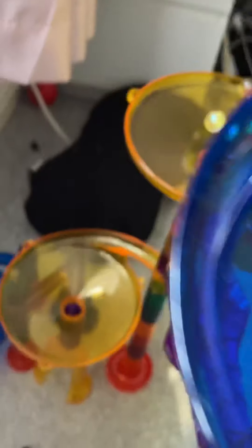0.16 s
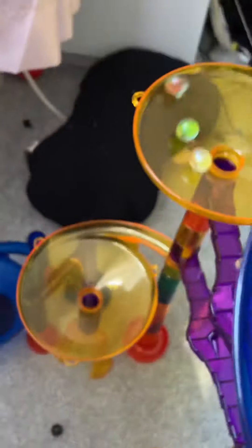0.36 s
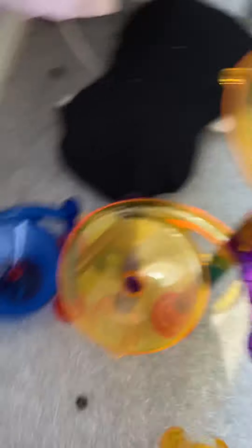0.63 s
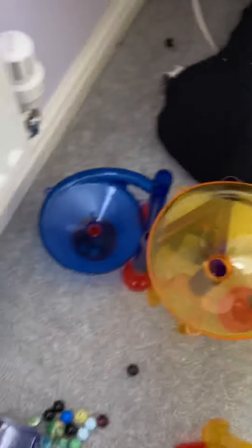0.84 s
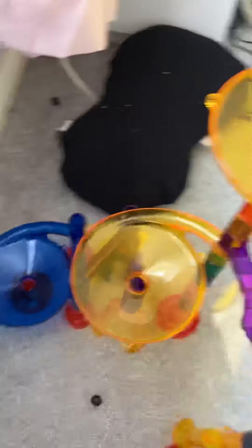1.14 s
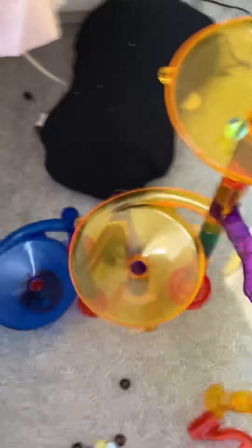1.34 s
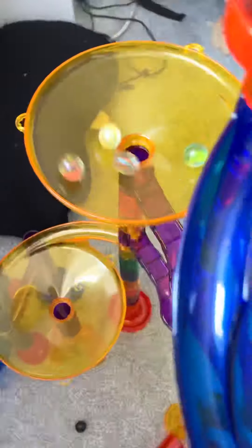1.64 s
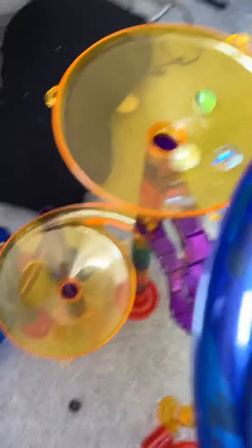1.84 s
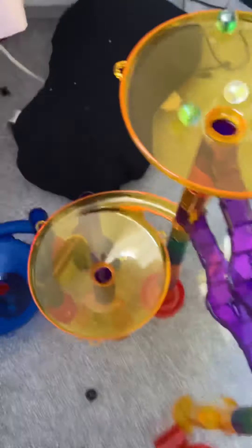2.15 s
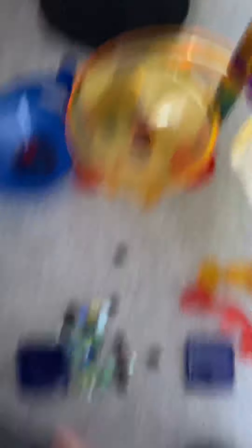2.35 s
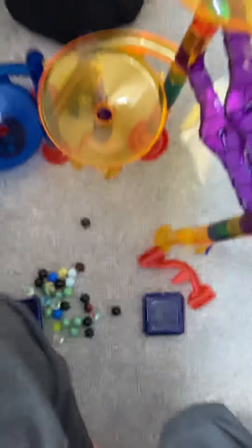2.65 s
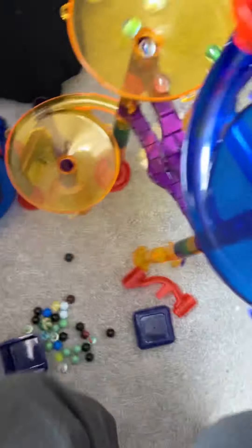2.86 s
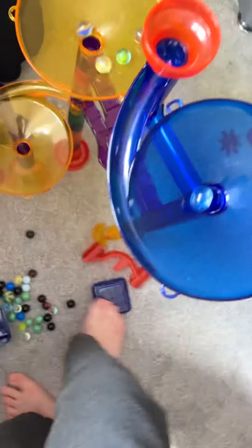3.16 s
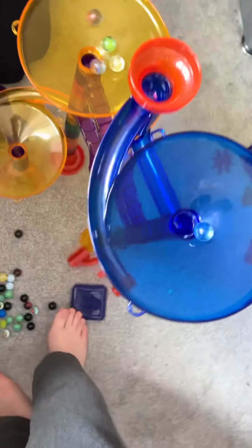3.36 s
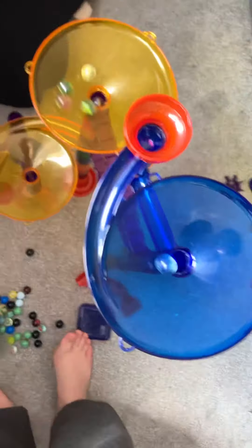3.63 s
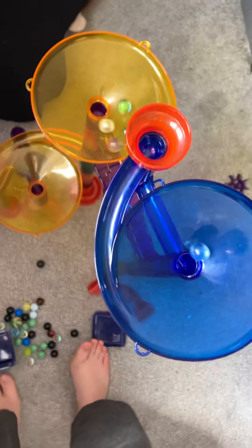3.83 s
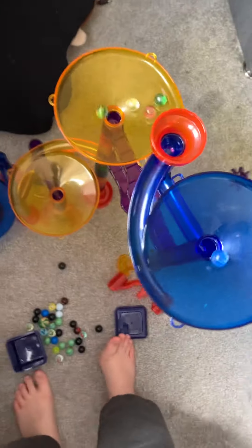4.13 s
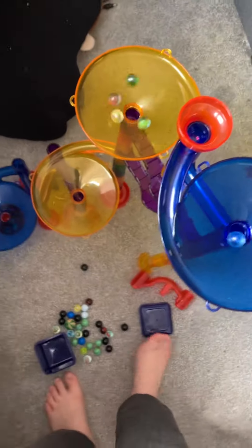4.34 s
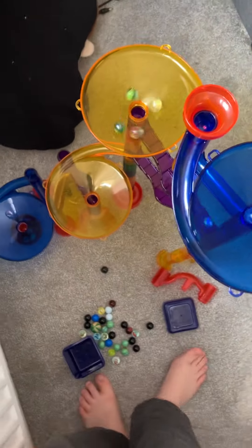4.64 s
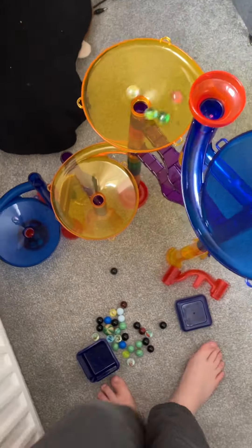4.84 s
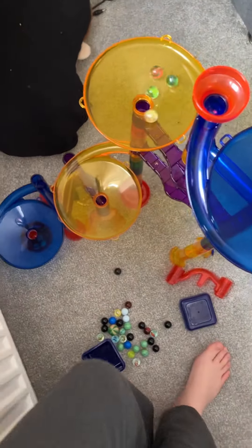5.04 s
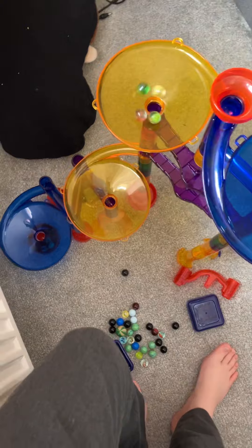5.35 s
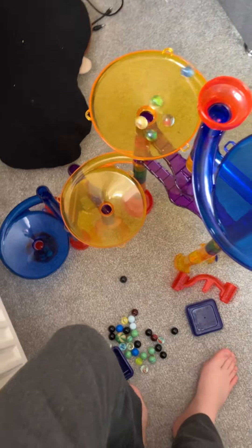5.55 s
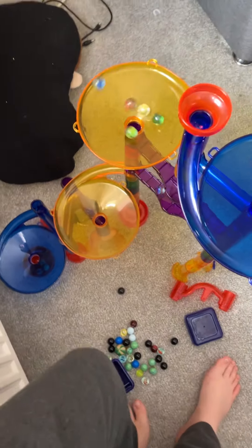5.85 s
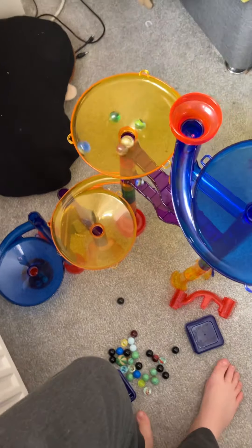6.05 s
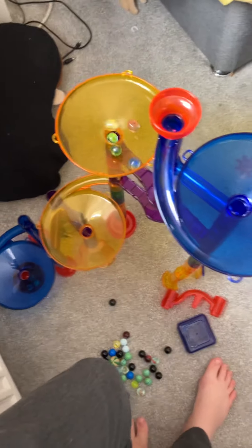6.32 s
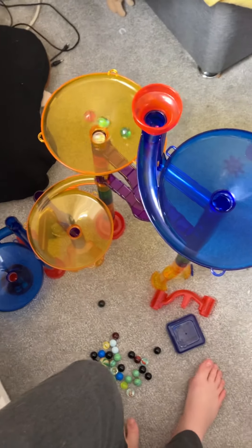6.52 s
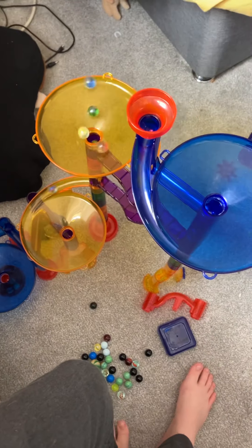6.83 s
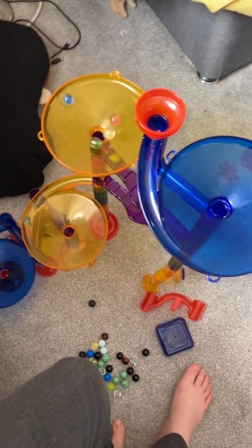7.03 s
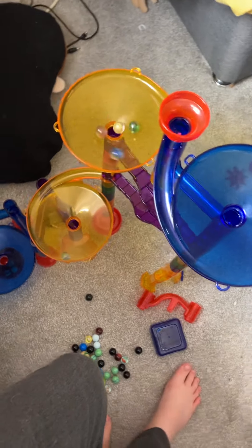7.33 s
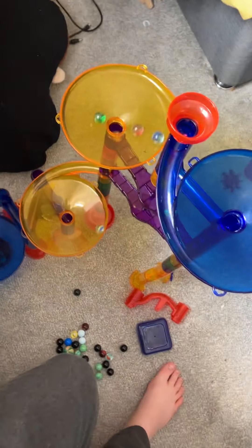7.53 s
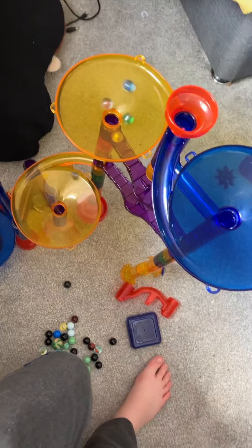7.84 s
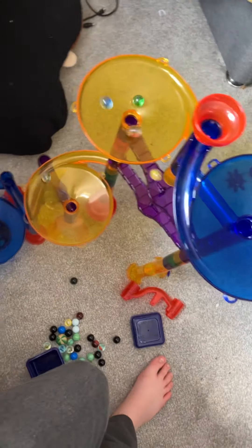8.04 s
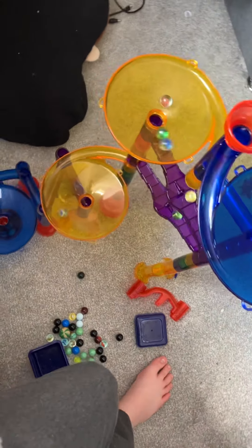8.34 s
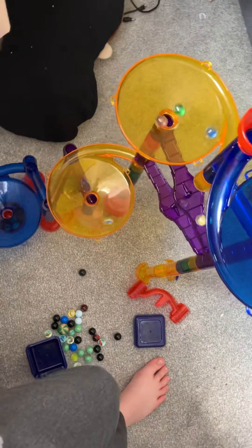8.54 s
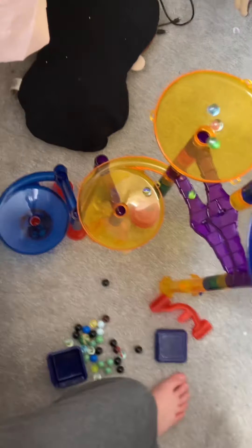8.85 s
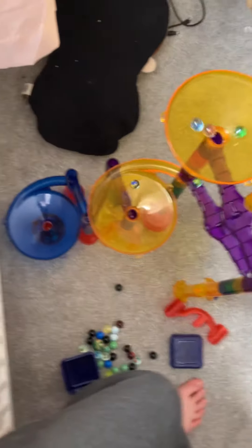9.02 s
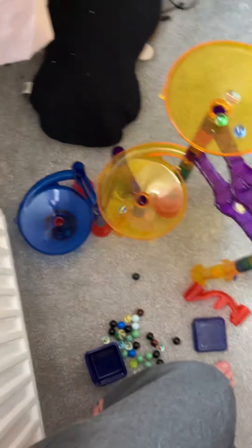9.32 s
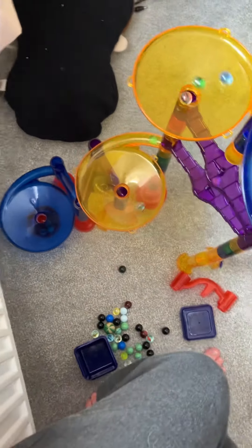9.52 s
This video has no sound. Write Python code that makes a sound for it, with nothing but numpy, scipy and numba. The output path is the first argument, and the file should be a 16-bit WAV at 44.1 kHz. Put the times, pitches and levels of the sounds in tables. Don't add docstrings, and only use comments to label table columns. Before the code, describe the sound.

A plastic marble run heard close on a hand-held phone in a dry, carpeted room. Rolling marbles drone and hiss steadily in the funnels while irregular knocks ring the hollow plastic early on. After a quieter stretch, marble after marble drops onto steps with rapid bright clacks, rebounds and short glassy cracks, until the last burst dies into rolling and faint taps. Low soft footfalls and hand tremor lie underneath.

```python
import sys
import numpy as np
from scipy import signal
from scipy.fft import rfft, irfft
from scipy.io import wavfile
from scipy.ndimage import uniform_filter1d, minimum_filter1d
from numba import njit

SR = 44100
rng = np.random.default_rng(int(sys.argv[2]) if len(sys.argv) > 2 else 0)


def output_pcm(signal):
    pcm = np.clip(np.atleast_2d(signal).T, -1, 1) * 32767
    wavfile.write(sys.argv[1], SR, np.round(pcm).astype(np.int16))


def natural_amplitude(level_db):
    exponent = np.asarray(level_db, float) / 20
    return 10 ** exponent


N = 426888
HZ = np.arange(N // 2 + 1) * SR / N
FUNNELS_UNTIL_S, CHUTE_FROM_S = 3.23, 3.75
CONTACT_S = 0.0008

# centre in Hz, width in Hz, level in dB.
SHELL = [(974, 170, -6), (1340, 58, 2), (1490, 73, 2.5), (1740, 258, -4), (2360, 220, -10.5),
         (2810, 670, -20)]


def colour(x, points):
    hz, db = np.transpose(points)
    curve_db = np.interp(np.log(HZ + 1), np.log(hz), db)
    return irfft(rfft(x) * natural_amplitude(curve_db), N)


def resonate(x, peaks):
    gain = 0
    for k, (f, width, db) in enumerate(peaks):
        bandpass = 1j * HZ * width / (f * f - HZ * HZ + 1j * HZ * width)
        gain = gain + (-1) ** k * natural_amplitude(db) * bandpass
    return irfft(rfft(x) * gain, N)


def unit(x):
    return x / np.sqrt(np.mean(x ** 2))


def walk(rate):
    hold = int(SR / rate)
    steps = np.repeat(rng.standard_normal(N // hold + 1), hold)
    return unit(uniform_filter1d(steps, hold)[:N])


def spread(make, likeness):
    likeness = np.clip(likeness, 0, 1)
    common = np.sqrt(1 + likeness) * make()
    opposed = np.sqrt(1 - likeness) * make() * np.array([[1], [-1]])
    return common + opposed


def hollow_db(s):
    # time in seconds, boom in dB.
    boom = [(0, 5), (.95, 9), (1.3, -1), (2.9, 5), (3.2, -3), (4.1, -3), (4.9, -3), (6.0, 1), (6.7, -6.5),
            (7.2, -1.5), (7.6, -4.5), (8.1, 0.5), (9.68, 0.5)]
    return np.interp(s, *np.transpose(boom))


def contacts(rebound_s, loss_db, dull_db, count):
    # start in seconds, peak in dB, strongest mode in Hz, then the level of the hard upper modes
    # and of the crack, both in dB relative to the peak.
    joints = [(0.0202, -27, 1530, -9, -3), (0.3889, -19.5, 1420, -20, -17), (0.4691, -20, 1380, -32, -13.5),
              (0.683, -18, 1480, -9, -10), (0.865, -26, 1500, -1.5, -15), (0.8934, -28, 1625, 9, -6),
              (0.9212, -25, 1720, 3, -9), (0.9631, -3.5, 1670, -2, -12), (0.9884, -12, 1530, -9, -9),
              (1.009, -4, 1490, -6, -17), (1.048, -6.5, 1610, -5.5, -15), (1.0727, -16.5, 1590, -31, -31),
              (1.406, -10.5, 1840, 4, -12), (1.4165, -8, 1630, -14, -20), (1.4318, -22, 1550, 5, 1),
              (1.4484, -16, 1640, 14, -25), (1.5088, -10, 1650, 4.5, -4), (1.5573, -21, 1400, -17, -28),
              (1.6038, -17.5, 1420, -21, -20), (1.7807, -25.5, 1490, -14, -7.5),
              (1.824, -19.5, 1490, -6, -16), (1.9293, -13, 1460, -16, -30), (2.1961, -22.5, 1460, -26, -2)]
    marble_1 = [(3.186, -19, 1490, -20, -24), (3.3835, -25, 1450, -27, -19), (3.486, -20, 1370, -3, -27),
                (3.498, -21, 1570, -3, -8), (3.5052, -21.5, 1360, 6.5, -5), (3.559, -19, 1820, -7, -6),
                (3.5768, -3, 1396, -9.5, -12.5), (3.662, -7, 1395, -8.5, -11),
                (3.7263, -7.5, 1636, -9, -14.5), (3.746, -18, 1340, -17, -23),
                (3.7761, -11, 1600, -2.5, -14), (3.8082, -17.5, 1670, -4, -19), (3.83, -34, 1510, -16, -25),
                (3.8498, -9, 1650, -9, -17), (3.8766, -18.5, 1660, -5, -11), (3.9301, -13, 1636, -1.5, -9),
                (3.9456, -17.5, 1830, -9, -22), (3.9838, -22, 1610, -2, -12), (4.007, -14, 1880, 1.5, -6.5),
                (4.026, -20, 1780, -3, -23), (4.065, -13.5, 1745, 0.5, -8), (4.086, -16.5, 1650, -7, -7),
                (4.1157, -13.5, 1740, 1, -14.5), (4.1389, -17.5, 1730, -9, -29),
                (4.2683, -20.5, 1380, -10, -28), (4.33, -21, 1740, -1, -11)]
    marble_2 = [(4.4378, -10, 1730, -3.5, -8), (4.458, -17, 1716, -12, -13), (4.487, -17.5, 1580, -11, -22),
                (4.502, -31, 1600, 2, -14), (4.5261, -12, 1560, -1, -13), (4.586, -18.5, 1460, -6, -32),
                (4.5979, -15, 1454, -6, -21), (4.6059, -12, 1450, -4.5, -10.5),
                (4.627, -17.5, 1360, -5, -16), (4.6416, -23.5, 1490, 5, -13), (4.6623, -20, 1490, -3, -16),
                (4.675, -6.5, 1740, -3.5, -18.5), (4.699, -18, 1680, 5, -8), (4.7118, -4, 1490, -9, -22),
                (4.7404, -21, 1660, 6, -8), (4.7505, -6, 1495, -10.5, -20), (4.7768, -4, 1696, -8, -13),
                (4.8698, -5.5, 1650, -8, -15), (4.9461, -6, 1700, -7.5, -14.5),
                (4.9778, -9, 1740, -10, -16.5), (5.0217, -11.5, 1690, -9, -16), (5.052, -14, 1710, 2, -11),
                (5.061, -18, 1500, 0, -12), (5.0674, -18.5, 1580, -4, -14), (5.0868, -15, 1730, -9, -25),
                (5.1135, -9, 1570, 4, -3.5), (5.1528, -17, 1700, 2, -14), (5.2223, -12.5, 1630, -8.5, -7),
                (5.2505, -21, 1560, -1.5, -18), (5.3226, -15.5, 1540, -3, -8),
                (5.415, -11, 1695, -4.5, -16), (5.445, -24, 1620, -6, -16), (5.4887, -24.5, 1720, 7, 1),
                (5.538, -19.5, 1280, 1.5, -11), (5.615, -28.5, 1470, 0, -8)]
    marble_3 = [(5.6597, -18.5, 1340, 2.5, -7), (5.805, -16, 1570, -1, -2.5),
                (5.9239, -16.5, 1770, -0.5, -5.5), (6.0259, -11, 1540, -9, -11.5),
                (6.051, -23, 1345, -13, -5), (6.1217, -18.5, 1360, 7, -7), (6.1896, -17, 1680, -2, -20),
                (6.196, -18.5, 1340, -8, -4), (6.2025, -17, 1385, -11, -20),
                (6.2212, -13.5, 1360, -0.5, -4.5), (6.2778, -13.5, 1350, 5, -8),
                (6.3367, -20, 1520, -2.5, -16), (6.3684, -19, 1740, -1.5, -15),
                (6.392, -27, 1810, 7.5, -19)]
    marble_4 = [(6.7376, -13, 1740, -1.5, -4), (6.7577, -25.5, 1680, 8, 0), (6.7668, -5.5, 1380, -5.5, -13),
                (6.7742, -23, 1350, -17, -6), (6.7934, -19, 1640, -11, -3),
                (6.8135, -5.5, 1740, -11, -11.5), (6.8704, -10, 1380, -11, -12),
                (6.9112, -13, 1640, -6.5, -10.5), (6.9397, -15, 1600, -2, -23),
                (6.957, -21.5, 1400, -7, -26), (6.97, -20, 1430, -23, -27), (7.0167, -8, 1676, -12, -13),
                (7.045, -20, 1670, -6, -13), (7.0557, -22, 1350, -19, -16), (7.1057, -13.5, 1540, -4.5, -7),
                (7.1857, -18, 1570, 3.5, -2.5), (7.245, -17.5, 1710, -1, -3.5), (7.2648, -19, 1630, -1, -2),
                (7.294, -16, 1700, 0, -11), (7.314, -18, 1750, -8, -12), (7.4368, -16.5, 1580, 0.5, -4.5)]
    marble_5 = [(7.5505, -12, 1740, -2, -6), (7.5619, -3.5, 1675, -9, -9.5), (7.569, -14, 1660, -8, -19),
                (7.5987, -10, 1613, -10, -11), (7.6479, -8.5, 1790, -4.5, -12.5),
                (7.6827, -11.5, 1700, -16, -11), (7.7106, -18.5, 1720, -10, -9),
                (7.7314, -17, 1590, -11, -33), (7.7382, -19, 1530, 1.5, -4), (7.7472, -17, 1750, -21, -16),
                (7.7608, -16, 1490, -12, -13), (7.816, -10, 1740, -3.5, -12), (7.8739, -6, 1785, -7, -9),
                (7.9054, -19, 1700, -6, -4), (7.9097, -2.5, 1760, -6.5, -14), (7.919, -16, 1700, -10, -1),
                (7.9309, -12, 1740, -9, -13), (7.9608, -12, 1800, -5, -11), (7.9864, -12, 1740, -11, -12),
                (8.025, -14.5, 1740, -4.5, -15), (8.0356, -19.5, 1830, 5, -1),
                (8.0542, -18.5, 1740, -1, -17), (8.0732, -25, 1750, 1, -18), (8.0946, -19, 1730, 4, -6),
                (8.114, -14, 1720, -0.5, -2.5), (8.143, -16.5, 1364, -1, -8), (8.1634, -19, 1740, 1, -13),
                (8.2024, -17.5, 1540, -1, -7), (8.29, -10.5, 1705, -6, -11), (8.301, -22.5, 1700, 5, -3),
                (8.3583, -19.5, 1780, 0, -3), (8.381, -32.5, 1700, 6, 9), (8.417, -23.5, 1770, 2, -3),
                (8.436, -11.5, 1720, -4, -9.5), (8.4568, -23.5, 1730, -8, -3)]
    marble_6 = [(8.5639, -18, 1720, 3.5, -6), (8.6014, -23, 1310, 3, -9), (8.6572, -17, 1340, 0.5, -5.5),
                (8.681, -24, 1810, -1, -3.5), (8.7326, -19, 1970, 2, -0.5), (8.738, -11.5, 1750, 1, -11.5),
                (8.7958, -19.5, 1740, 4.5, -1), (8.8144, -24.5, 1420, -1, -22),
                (8.8385, -3.5, 1800, -7.5, -12), (8.8454, -10, 1330, -7, -7), (8.856, -12, 1794, -10, -16),
                (8.9181, -14, 1716, -8, -11), (8.949, -12.5, 1790, -5.5, -10),
                (8.9756, -18.5, 1490, -13, -10), (8.987, -19.5, 1720, -1, -19),
                (9.0094, -19.5, 1780, -5.5, -15), (9.0452, -15, 1860, 2.5, -12),
                (9.06, -14, 1840, -17, -7.5), (9.1088, -17, 1550, -0.5, -12), (9.118, -20.5, 1630, -1, -5),
                (9.1482, -6.5, 1790, 1, -12), (9.2066, -13, 1770, 0, -22), (9.2514, -18, 1760, 7, -2.5),
                (9.265, -28, 1660, 4, -3), (9.326, -25.5, 1750, 7.5, 1), (9.3791, -23.5, 1820, 3, -9.5)]
    last_step = [
        (9.5506, -25, 1800, 2, -1.2),
        (9.6762, -27, 1680, -1, -1.2),
    ]
    first = np.vstack([joints, marble_1, marble_2, marble_3, marble_4, marble_5, marble_6, last_step])
    first[:, 1] += 3.0
    draw = rng.random((len(first), count, 2))
    after = np.repeat(first[:, None], count, axis=1)
    delay = np.cumsum(0.0045 + rebound_s * draw[..., 0], axis=1)
    after[..., 0] = np.minimum(after[..., 0] + delay, (N - 1) / SR)
    joint_loss_db = -8 * (first[:, :1] < CHUTE_FROM_S)
    after[..., 1] += loss_db - 10 * draw[..., 1] + joint_loss_db
    after[..., 4] += dull_db
    return np.vstack([first, after.reshape(-1, first.shape[1])])


@njit
def ring(start, pole, gain, rise):
    out = np.zeros((2, N))
    for m in range(len(start)):
        z, soft = 1. + 0j, 1.
        for i in range(start[m], N):
            z *= pole[m]
            soft *= rise
            out[0, i] += (1 - soft) * (gain[0, m] * z).imag
            out[1, i] += (1 - soft) * (gain[1, m] * z).imag
            if abs(z) < 1e-3:
                break
    return out


def shared(db):
    return db - 10 * np.log10(np.sum(natural_amplitude(2 * db), axis=1, keepdims=True))


def knocks(hits, scatter_db, detune, body_detune, side_rad):
    # pitch in Hz, level in dB, t60 in seconds.
    low_modes = [(286, -19.5, 0.11), (481, -13.5, 0.029), (604, 4.5, 0.054), (823, 2.5, 0.042),
                 (1113, 4, 0.023)]
    hard_modes = [(2262, 6, 0.031), (2513, 5, 0.035), (2696, 2, 0.048), (2941, 2.5, 0.034),
                  (3170, 7, 0.037), (3850, 0, 0.036), (4310, -8, 0.079)]
    main_modes = [(1386.5, -3.5, 0.057), (1490, -3, 0.037), (1660, -4, 0.046), (1739, -4.5, 0.055),
                  (1990, -32, 0.0083)]
    chute_body_db = [7, 13.2, 1.46, 9.3, 6.1]
    joint_hard_db = [-6, -6, -4, 14, 8, 0, 17]
    s, peak_db, best_hz, hard_db, _ = np.transpose(hits)[:, :, None]
    modes = np.vstack([low_modes, hard_modes, main_modes])
    low = len(low_modes)
    hard = low + len(hard_modes)
    count = len(modes) + 1
    at_joint = s < FUNNELS_UNTIL_S
    draw = rng.standard_normal((len(s), 4, count))

    detuning = np.where(np.arange(count - 1) < low, body_detune, detune)
    hz = modes[:, 0] * (1 + detuning * draw[:, 0, 1:])
    hz = np.hstack([hz, best_hz])

    t60 = np.append(modes[:, 2], 0.035) * natural_amplitude(1.5 * draw[:, 1])
    t60 = t60 * np.minimum(1, 2000 / hz)
    t60 = t60 * np.where(at_joint & (np.abs(hz - 1500) < 600), 0.45, 1)

    db = np.append(modes[:, 1], 3.5) + scatter_db * np.clip(draw[:, 2], -3, 1.3) / (1 + at_joint)
    db[:, low:hard] += 1.5 * scatter_db * np.clip(draw[:, 1, low:hard], -2, 1.5) / 2
    db[:, :low] += -0.3 * peak_db - 28.0 + hollow_db(s) + (s > CHUTE_FROM_S) * np.array(chute_body_db)
    db[:, low:hard] = hard_db - 0.6 + shared(db[:, low:hard] + at_joint * np.array(joint_hard_db))
    db[:, hard:] = shared(db[:, hard:])

    skew = side_rad * draw[:, 3] * np.sqrt(hz / 1500)
    right_db = 2.0 * np.exp(-np.log(hz / 1800) ** 2)
    left = natural_amplitude(-right_db / 2) * np.exp(1j * skew)
    right = natural_amplitude(right_db / 2) * np.exp(-1j * skew)
    gain = natural_amplitude(peak_db + db) * np.array([left, right])
    pole = np.exp(2j * np.pi * hz / SR - np.log(1000) / (t60 * SR))
    start = (s * SR * np.ones(count)).astype(np.int64)
    return ring(start.ravel(), pole.ravel(), gain.reshape(2, -1), np.exp(-1 / (CONTACT_S * SR)))


def scuffs(s, db, chatter_s, tail_s, tail_db):
    # frequency in Hz, level in dB.
    scuff_colour = [(1200, -23), (2100, -5), (3300, -8), (4500, -11.5), (5200, -12), (6500, -13),
                    (11000, -22.5)]
    t = np.arange(4000) / SR
    decay = np.exp(-t / chatter_s) + natural_amplitude(tail_db) * np.exp(-t / tail_s)
    shape = (1 - np.exp(-t / CONTACT_S)) * decay
    blows = np.bincount((s * SR).astype(int), natural_amplitude(db), N)
    swell = signal.fftconvolve(blows, shape)[:N]
    return spread(lambda: colour(swell * rng.standard_normal(N), scuff_colour), 0.75)


def cracks(s, db, chatter_s, tail_s, tail_db, count):
    # frequency in Hz, level in dB.
    glass = [(3000, -16.5), (4600, 7.5), (9000, 9.5), (11000, 9), (13000, 6), (15500, -2), (16500, -24),
             (16900, -43)]
    start = (s * SR).astype(np.int64)
    blows = np.bincount(start, natural_amplitude(db), N)
    t = np.arange(4000) / SR
    decay = np.exp(-(t / chatter_s) ** 2) + natural_amplitude(tail_db) * np.exp(-t / tail_s)
    shape = (1 - np.exp(-t / CONTACT_S)) * decay
    swell = signal.fftconvolve(blows, shape)[:N]
    fizz = swell * spread(lambda: rng.standard_normal(N), 0.85) / 0.99
    draw = rng.random((len(s), 2, count))
    ping_hz = 4500 + 11000 * draw[:, 0] ** 1.4
    pole = np.exp(2j * np.pi * ping_hz / SR - np.log(1000) / (0.014 * SR))
    gain = natural_amplitude(db[:, None] - 3.0 - 14.0 * draw[:, 1]).ravel() * np.ones((2, 1), complex)
    pings = ring(np.repeat(start, count), pole.ravel(), gain, np.exp(-1 / (CONTACT_S * SR)))[0]
    return colour(fizz + pings, glass)


def glass_cracks(hits):
    # start in seconds, peak in dB.
    ticks = [(0.038, -59), (0.129, -58.5), (0.601, -45), (0.725, -55.5), (0.876, -55), (0.913, -52),
             (0.9466, -43), (1.002, -52), (1.149, -60), (1.495, -50), (1.997, -55), (2.237, -57),
             (2.315, -63), (2.58, -45), (2.596, -54), (2.934, -60), (3.232, -66), (3.3902, -50.5),
             (4.679, -35), (5.263, -60), (5.517, -51), (6.248, -50), (6.322, -60), (6.6113, -53),
             (6.68, -45.5), (6.684, -48), (6.835, -59), (7.202, -55), (7.213, -56), (7.395, -60),
             (7.461, -52), (7.516, -53), (7.576, -45), (8.321, -55), (8.486, -60), (8.652, -54),
             (8.956, -51), (9.157, -47), (9.354, -43), (9.386, -52), (9.398, -57), (9.567, -60),
             (9.668, -56)]
    tick_s, tick_db = np.transpose(ticks)
    s = np.append(hits[:, 0], tick_s)
    db = np.append(hits[:, 1] + hits[:, 4] - 6.5, tick_db + 19.0)
    crack = cracks(s, db, chatter_s=0.0021, tail_s=0.008, tail_db=-28, count=6)
    topmost = irfft(rfft(crack) * (HZ > 11500), N)
    return crack - 0.45 * (np.arange(N) / SR < FUNNELS_UNTIL_S) * topmost


def grains(per_s, scatter_db, bed):
    draw = rng.random((3, N))
    size = natural_amplitude(scatter_db * np.minimum(-np.log(draw[1] + 1e-9), 4.5)) * np.sign(draw[2] - 0.5)
    return unit((draw[0] < per_s / SR) * size) + bed * rng.standard_normal(N)


def drifting(bumps, drift_db):
    out = 0
    for k, (peak, db) in enumerate(zip(SHELL, drift_db)):
        out = out + (-1) ** k * resonate(bumps, [peak]) * natural_amplitude(db)
    return unit(out)


def run_ups(t):
    # moment of the drop in seconds, scrape level in dB.
    drops = [
        (.95, -37),
        (3.55, -31.5),
        (4.66, -30.5),
        (6.73, -31),
        (7.55, -30.5),
        (9.14, -32),
    ]
    power = 0
    for s, db in drops:
        swell_s, stop_s = 0.056, 0.04
        distance = np.where(t < s, (s - t) / swell_s, (t - s) / stop_s)
        power = power + natural_amplitude(2 * db) * np.exp(-2 * distance)
    return power


def rolling_levels():
    # time in seconds, shell drone in dB.
    roll = [(0, -36), (.67, -39.5), (1.0, -37.5), (1.37, -38.5), (2.13, -36.5), (2.42, -40), (3.02, -38),
            (3.23, -42.5), (3.6, -37.5), (4.3, -39), (5.25, -39.5), (6.0, -39.5), (6.28, -37), (6.5, -41),
            (7.1, -38.5), (8.0, -40.5), (9.15, -41.5), (9.4, -39.5), (9.55, -43)]
    # time in seconds, level in dB.
    orbit_grit = [(0, -8.5), (2.3, -9), (3.3, -11.5), (6.5, -15.5), (9.68, -7.5)]
    t = np.arange(N) / SR
    faintest_db, scrape_grit_db = -47, -5.5
    circling = natural_amplitude(2 * np.maximum(np.interp(t, *np.transpose(roll)), faintest_db))
    scraping = run_ups(t)
    shell_db = 10 * np.log10(circling + scraping)
    orbit_grit_db = np.interp(t, *np.transpose(orbit_grit))
    grit = circling * natural_amplitude(2 * orbit_grit_db) + scraping * natural_amplitude(2 * scrape_grit_db)
    return shell_db, 10 * np.log10(grit) - shell_db


def rolling(shell_db, grit_db):
    # centre in Hz, width in Hz, level in dB.
    throat_peaks = [(305, 143, -11.5), (450, 190, -11.5), (642.5, 72, 2.5), (802, 41, -11.5)]
    # frequency in Hz, level in dB.
    grit_colour = [(2500, -12), (4000, 2), (6500, -1.5), (8200, -4), (11000, -6), (12500, -0.5),
                   (15200, -30.5), (16000, -48)]
    orbit, flicker = 1.8 * walk(28), 2.0 * walk(22)
    drift_db = [2 * walk(7) for _ in SHELL]
    shell = spread(lambda: drifting(grains(700, 3.3, 0.98), drift_db), 0.53)
    throat = spread(lambda: unit(resonate(grains(700, 3.8, 1.35), throat_peaks)), 0.63)
    grit = spread(lambda: unit(colour(grains(3800, 5.5, 0.79), grit_colour)), 0.77) / 1.935
    shell = shell * natural_amplitude(shell_db + orbit + np.array([[-1.2], [1.2]]))
    throat_db = 0.42 * shell_db - 33.5 + 0.5 * hollow_db(np.arange(N) / SR) + flicker
    throat = throat * natural_amplitude(throat_db + np.array([[-0.8], [0.8]]))
    return shell + throat + grit * natural_amplitude(shell_db + grit_db + 0.4 * orbit + 2.2 * walk(25))


def room(x):
    t60_s, level_db = 0.087, -14
    t = np.arange(int(0.4 * SR)) / SR
    tail = rng.standard_normal((2, len(t))) * np.exp(-np.log(1000) * t / t60_s) * (t > 0.004)
    tail = signal.lfilter([1], [1, -0.6], tail)
    return natural_amplitude(level_db) * signal.fftconvolve(x, unit(tail) / np.sqrt(len(t)), axes=1)[:, :N]


def hand():
    # frequency in Hz, level in dB.
    rumble = [(26, -39), (44, -1), (62, -8), (120, -1), (180, -8.5), (300, -9.5), (500, -25.5)]
    # time in seconds, level in dB.
    grip = [(0, -64.5), (2.9, -57), (3.2, -68), (6.1, -56.5), (9.68, -59)]
    # middle in seconds, rms in dB, pitch in Hz, length in seconds.
    thumps = [
        (0.115, -53.5, 91.5, 0.17),
        (0.763, -46.5, 60, 0.22),
        (1.696, -54, 95, 0.11),
        (2.188, -42, 70.5, 0.06),
        (2.638, -45, 65, 0.11),
        (6.278, -34, 450, 0.15),
        (8.407, -53, 90, 0.15),
    ]
    t = np.arange(N) / SR
    tremor_db = np.interp(t, *np.transpose(grip)) + 0.62 * walk(7.6)
    out = spread(lambda: unit(colour(rng.standard_normal(N), rumble)), 0.79) * natural_amplitude(tremor_db)
    for s, db, hz, length in thumps:
        swell = np.exp(-((t - s) / length) ** 2 * 8)
        band = [(hz / 4, -40), (hz, 0), (hz * 1.06, 0), (hz * 5.1, -30), (hz * 9.0, -70)]
        out += spread(lambda: unit(colour(rng.standard_normal(N), band)), 0.93) * swell * natural_amplitude(db)
    return out


def scene():
    hits = contacts(rebound_s=0.013, loss_db=-12.5, dull_db=-7, count=2)
    rings = knocks(hits, scatter_db=5.0, detune=0.015, body_detune=0.08, side_rad=0.35)
    scuff_db = hits[:, 1] + hits[:, 3] - 2.5
    rings = rings + scuffs(hits[:, 0], scuff_db, chatter_s=0.0056, tail_s=0.027, tail_db=-15.0)
    return rings + room(rings) + glass_cracks(hits) + rolling(*rolling_levels()) + hand()


def mute_faint_bands(ports):
    quiet_db, quiet_from_hz = -100.8, 4900
    mid_side = [ports[0] + ports[1], ports[0] - ports[1]]
    hz, _, cells = signal.stft(mid_side, SR, nperseg=512, scaling="psd")
    power, hz = np.abs(cells / 2) ** 2, hz[:-1, None]
    band = np.repeat(power[:, :-1].reshape(2, 32, 8, -1).mean(axis=2), 8, axis=1)
    band = np.maximum(band, uniform_filter1d(band, size=5))
    loudness = -minimum_filter1d(-10 * np.log10(power.sum(axis=(0, 1)) + 1e-18), size=3)
    masking = 0.46 + 0.2 * (hz > 10800)
    limit_db = quiet_db + masking * (loudness + 58)
    limit_db = limit_db - 7 * (hz > 12900) + 6 * (hz > 10800) + 10 * (hz > 15900)
    sum_limit_db = limit_db - 7 * ((hz > 6300) & (hz < 10300))
    limit_db = np.array([sum_limit_db, limit_db + 2])
    cells[:, :-1] *= (10 * np.log10(band + 1e-18) > limit_db) | (hz < quiet_from_hz)
    total, difference = signal.istft(cells, SR, nperseg=512, scaling="psd")[1][:, :N]
    return np.array([total + difference, total - difference]) / 2


def roll_off(x):
    return signal.sosfilt(signal.butter(12, 16840, fs=SR, output="sos"), x)


def record(dry):
    port_lag_s, lag_from_hz, top_hz = 0.000161, 2400, 16650
    left, right = rfft(np.tanh(dry / 1.579) * 1.153)
    apart = (left - right) * (0.8 + 0.2 / (1 + (HZ / 4300) ** 12))
    lag = np.pi * port_lag_s * np.maximum(HZ - lag_from_hz, 0)
    ports = (left + right + apart * np.array([[1], [-1]])) / 2 * np.exp(1j * np.array([lag, -lag]))
    ports = irfft(ports / (1 + (HZ / top_hz) ** 120), N)
    return roll_off(mute_faint_bands(ports))


dry = scene()
out = record(dry)
output_pcm(out)
```